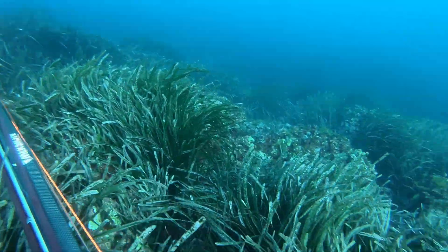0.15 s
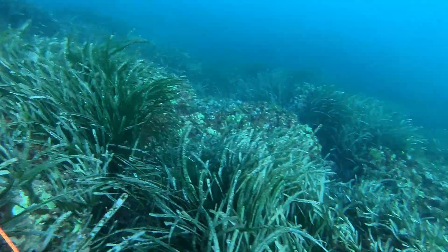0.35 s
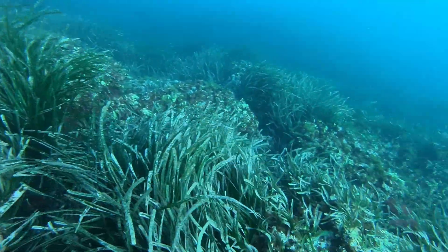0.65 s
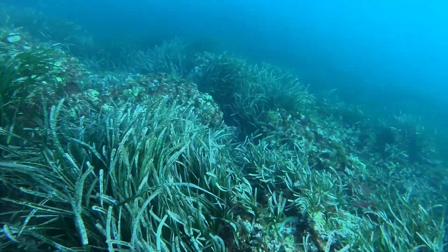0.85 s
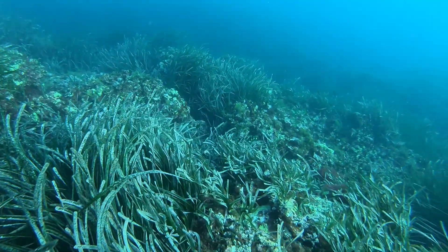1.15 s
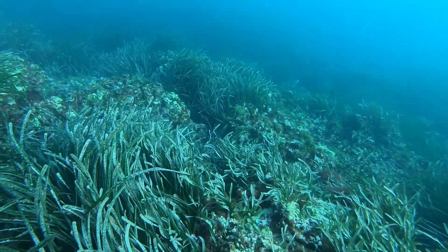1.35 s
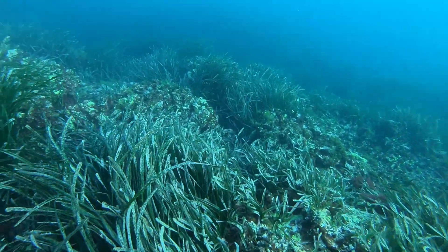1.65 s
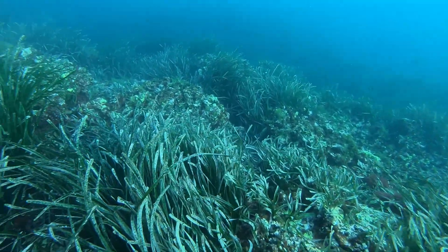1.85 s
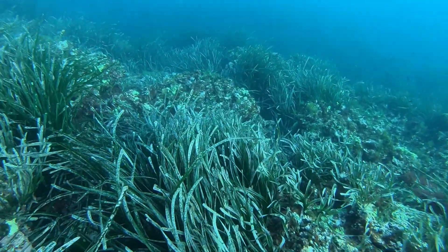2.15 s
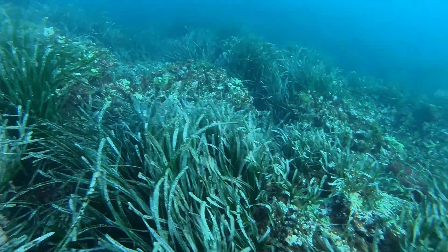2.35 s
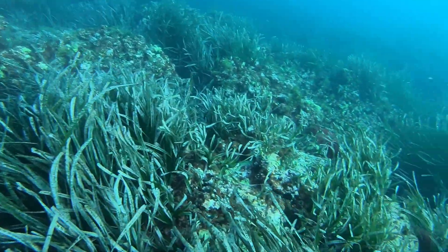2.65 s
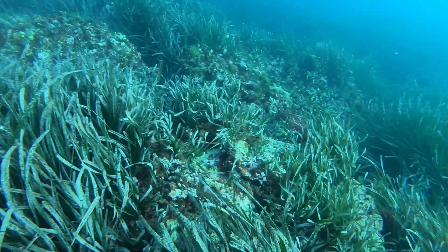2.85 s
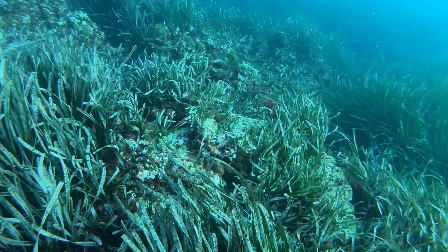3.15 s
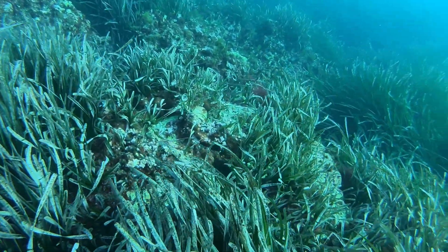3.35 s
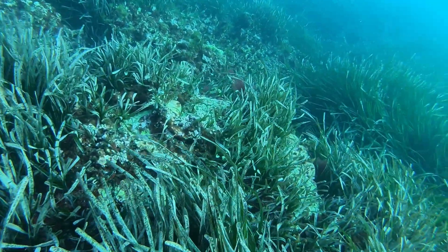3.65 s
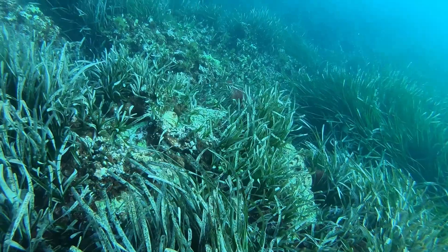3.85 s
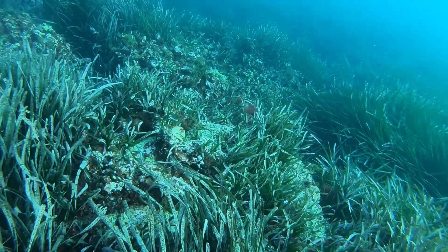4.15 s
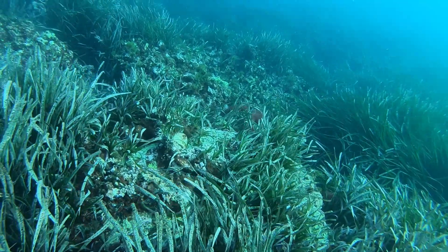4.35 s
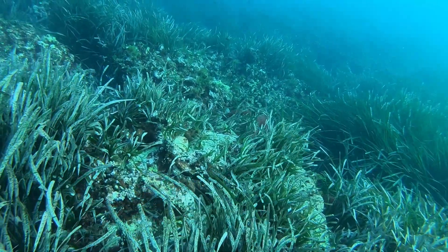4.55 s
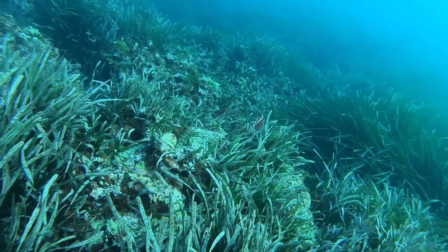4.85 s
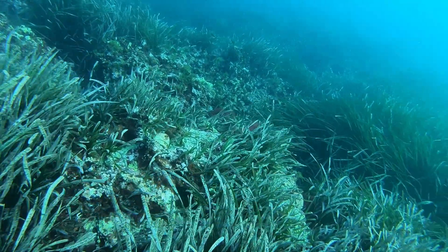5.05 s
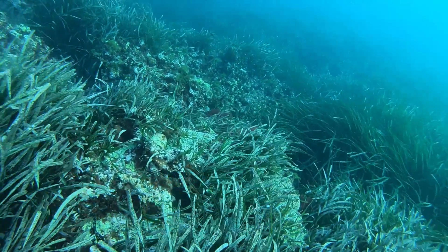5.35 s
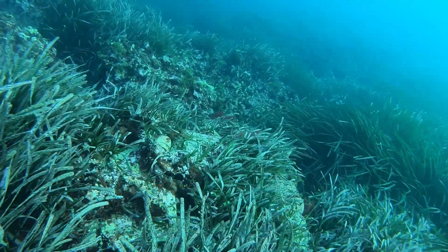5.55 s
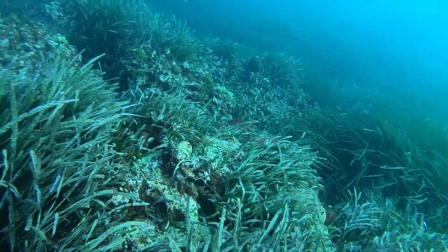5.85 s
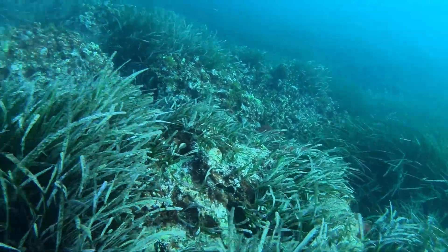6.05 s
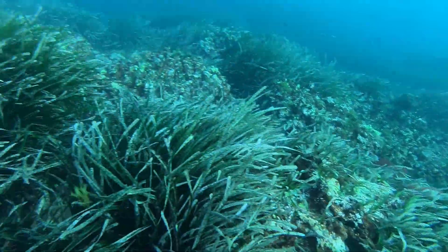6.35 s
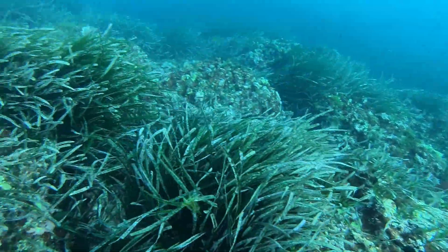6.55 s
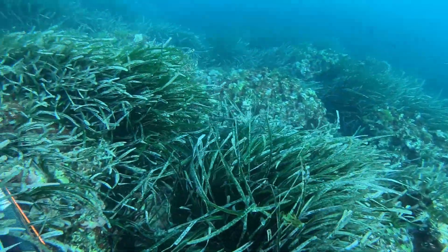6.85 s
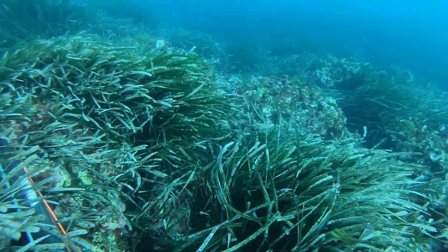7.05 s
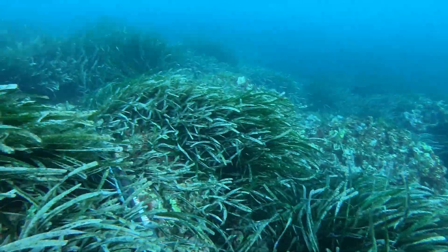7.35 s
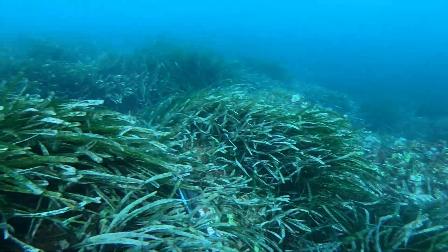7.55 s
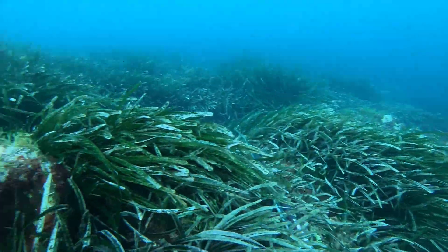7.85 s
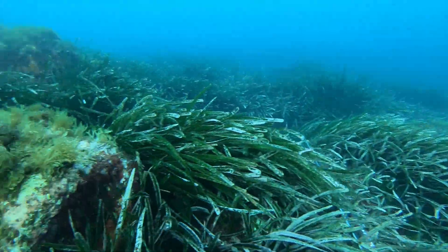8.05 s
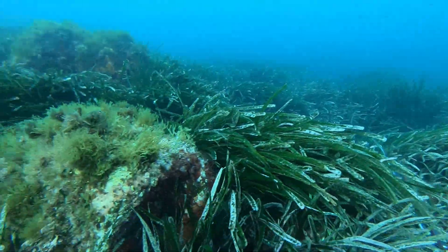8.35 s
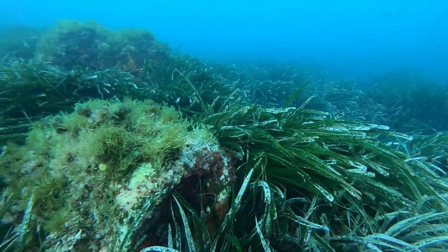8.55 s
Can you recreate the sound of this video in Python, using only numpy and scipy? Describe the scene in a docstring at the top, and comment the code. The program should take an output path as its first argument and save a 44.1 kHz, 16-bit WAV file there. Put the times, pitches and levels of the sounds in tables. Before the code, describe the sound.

A fine crackle of distant shrimp starts faintly and grows, dotted with sharp nearby snaps that ring briefly in a sealed underwater camera housing. Water surges past with a low rumble, peaking along with a cluster of muffled bumps on the housing. The rumble then eases while the crackle goes on, with a few small bubbly plops, and another short group of dull thumps comes near the end.

```python
"""A low rumble of water surges past a sealed camera housing, heard from inside, over a seagrass bed.
Snapping shrimp crackle far and near; each snap rings the stiff housing, whose ringing tones reach
the two microphones unevenly. The housing is bumped with dull thumps and swells shove it. A few short
plops, gulps and knocks come from bubbles or the bumped housing. Late on, the left channel fades over
to the right microphone, then starts to return."""
import sys
import numpy as np
from scipy import signal
from scipy.io import wavfile

SR = 44100
rng = np.random.default_rng(int(sys.argv[2]) if len(sys.argv) > 2 else 0)


def wrap_up_sound(samples):
    """Save the sound to the file named by the first command line argument, as 16-bit audio."""
    columns = np.atleast_2d(samples).T
    # keep every value between -1 and 1, then stretch to whole-number steps
    tamed = np.clip(columns, -1, 1)
    steps = np.round(tamed * 32767).astype(np.int16)
    wavfile.write(sys.argv[1], SR, steps)


N = 384111


def from_db(db):
    """Turn decibels into a number to multiply by."""
    return 10 ** (np.asarray(db) / 20)


def rms_one(x):
    """Scale a signal so its average strength (rms) is 1."""
    return x / np.sqrt(np.mean(x ** 2) + 1e-20)


def curve(rows):
    """Join (time, value) points with straight lines, giving one value per sample."""
    return np.interp(np.arange(N) / SR, *np.transpose(rows))


def band(x, low_hz, high_hz):
    """Keep the sound between two frequencies."""
    return signal.sosfilt(signal.butter(2, [low_hz, high_hz], "band", fs=SR, output="sos"), x)


def drift(rate_hz):
    """Wander to a new random value rate_hz times a second."""
    return np.interp(np.arange(N) / SR * rate_hz, np.arange(400), rng.standard_normal(400))


def surge():
    """Passing water makes slow rocking, a lumpy rumble and, higher up, a wash that differs by side."""
    # strength of the surge: (time [s], level [dB])
    strength = [(0.0, -54.5), (0.77, -66.5), (2.0, -61.5), (2.4, -49), (3.1, -45), (3.69, -48.5),
                (4.61, -55.5), (6.35, -63.5), (7.0, -79.5), (7.3, -64.5), (8.05, -76.5), (8.37, -55.5),
                (8.71, -62)]
    # rocking, rumble, wash: (low [Hz], high [Hz], left-right likeness [0-1], base [dB], swing share [0-1])
    bands = [(9.15, 15.17, 1, -51, 0.43), (24.9, 46, 0.83, -53, 0.72), (119.6, 214.5, 0, -64, 0.43)]
    mean_db, wash_start_db, wash_in_s = -55, -14, 1.32
    swing_db, layers = curve(strength) - mean_db, []
    for low_hz, high_hz, alike, base_db, share in bands:
        noise = band(rng.standard_normal((2, N + SR)), low_hz, high_hz)
        middle, side = rms_one(band(noise, 0.85 * low_hz, 3.56 * high_hz)[:, SR:])
        width = np.sqrt((1 - alike) / (1 + alike))
        lumps = from_db(base_db + share * swing_db + 4.84 * drift(20.5))
        layers.append(lumps * (middle + width * side * [[1], [-1]]))
    rocking, rumble, wash = layers
    fade_in = from_db(wash_start_db * np.clip(1 - np.arange(N) / SR / wash_in_s, 0, 1))
    return rocking + rumble + wash * fade_in


def far_snaps(level):
    """Far shrimp snap in clumps, each heard by five paths. Gives (sample, size, brightness [dB])."""
    snaps_per_s = 750 * from_db(4.5 * drift(12))
    at = np.flatnonzero(rng.random(N) < snaps_per_s / SR)[:, None]
    sizes = from_db(5.63 * np.minimum(rng.exponential(1, at.shape), 3.4) - 14.5) * level[at]
    lag = rng.exponential(.0024 * SR, (len(at), 5)).astype(int)
    paths = sizes * rng.standard_normal(lag.shape)
    bright_db = np.clip(rng.normal(2.28, 4.1, at.shape), -5.0, 11.0)
    return np.minimum(at + lag, N - 1).ravel(), paths.ravel(), np.repeat(bright_db, 5)


def near_snaps():
    """Near snaps echo off rock, grass and surface. Gives (sample, size, brightness [dB])."""
    # claws snapping close by: (time [s], strength [dB], brightness [dB])
    snaps = [(0.201, -58.5, 18), (0.7495, -42, -3.5), (1.073, -40, 1.5), (1.3332, -48, 9), (1.39, -40.5, 4),
             (1.4186, -42.5, 1.5), (1.965, -48.5, 9.5), (2.0023, -51, 4), (2.013, -40.5, -5.5),
             (2.108, -39, 9.5), (2.15, -32, 0), (2.2633, -56, 11), (2.339, -39, 2), (2.4398, -29.5, -0.5),
             (2.71, -49.5, 14), (2.7542, -39.5, 17), (3.1436, -38, -5), (3.1504, -37.5, 2.5),
             (3.267, -55, 21), (3.3939, -38, 4.5), (3.622, -45, 8), (3.9204, -32, 5.5), (4.0161, -24.5, 9),
             (4.0252, -35.5, 11), (4.493, -41.5, -2), (4.568, -40, 12.5), (4.6288, -55, 20.5),
             (4.805, -35, 1), (4.892, -55, 21), (5.339, -35, 4.5), (5.4616, -54.5, 26),
             (5.5433, -39.5, 17.5), (5.714, -36.5, -0.5), (5.734, -39, 4.5), (5.791, -37.5, 4),
             (5.85, -37.5, -3), (5.9945, -37, 19.5), (6.0031, -38.5, 4), (6.064, -39.5, 1),
             (6.081, -35.5, 4.5), (6.2925, -39.5, 11), (6.8846, -42.5, 11), (7.015, -36, 2.5),
             (7.0586, -28, 4.5), (7.109, -56, 22), (7.142, -44, 6), (7.233, -45.5, 9), (7.47, -55, 9),
             (7.5315, -48.5, 11), (7.572, -45.5, 15.5), (7.656, -35, 8), (7.683, -50, 21),
             (7.69, -45, 17.5), (8.3035, -44, -10), (8.3951, -41, 4.5), (8.4539, -35.5, -5.5),
             (8.4912, -43, -1), (8.553, -41.5, 11), (8.6018, -41, -4)]
    time_s, strength_db, bright_db = np.transpose(snaps)[:, :, None]
    lag_s = 0.034 * rng.random((len(time_s), 40)) ** 1.8 - .0008   # below zero: the claw is shutting
    echo = from_db(-14.5 - 60 * lag_s / 0.1) * rng.standard_normal(lag_s.shape)
    lag_s[:, 0], echo[:, 0] = 0, 1   # the direct sound
    at = np.minimum(np.round((time_s + lag_s) * SR).astype(int), N - 1)
    return at.ravel(), (from_db(strength_db) * echo).ravel(), np.repeat(bright_db, 40)


def ring(x, hz, fade_s, phase):
    """Each click in x starts a tone that dies away by 60 dB in fade_s."""
    decay, step = from_db(-60 / (fade_s * SR)), 2 * np.pi * hz / SR
    feedback = [1, -2 * decay * np.cos(step), decay * decay]
    return signal.lfilter([np.sin(phase), decay * np.sin(step - phase)], feedback, x + 1e-18)


def housing(at, sizes, bright_db, spread_db, blur):
    """Snaps and a soft hiss ring the housing's natural tones, a little differently on each side."""
    # the housing's natural tones: (pitch [Hz], time to fade 60 dB [s], level [dB],
    # lean to the left [dB], left head start [radians], left-right likeness [0-1])
    tones = [(838, 0.0093, 1, -3.5, 3, 0.68), (1280, 0.021, -11, 2.5, 4.5, 0.01),
             (1632, 0.066, -20, -8.5, 1.5, 0.1), (1807, 0.022, -8, -9, 0.53, 0.5),
             (1985, 0.032, -15.5, -2.5, 3, 0.2), (2690, 0.0073, -6, -9.5, 0.08, 1),
             (2968, 0.0064, -3, -6.5, -0.35, 0.34), (3336, 0.0093, -11.5, 3, -0.9, 0.58),
             (4430, 0.0055, -10.5, -4.5, -3, 0.47), (5285, 0.0036, -9, -12, -1.5, 0.5),
             (5995, 0.0079, -7, 1, 1.55, 0.9), (6700, 0.0046, -9, 10.5, 1, 0.35),
             (7730, 0.0017, -1, 3.5, 2.18, 0.2), (9830, 0.0015, 3.5, -6, 0.78, 0)]
    rung = np.zeros((2, 2, N))   # snaps and hiss, each left and right
    shared, *apart = blur * rng.standard_normal((3, N))
    for hz, fade_s, level_db, pan_db, lead, alike in tones:
        tilt = np.clip(np.log2(hz / 3400), -1.1, .7)   # bright snaps favour the high tones
        chance_db = spread_db * rng.standard_normal(N)[at // 300]   # close echoes share a colour
        struck = sizes * from_db(tilt * bright_db + chance_db)
        swell = from_db(0.45 * drift(2.485))   # each tone grows and fades as the housing turns
        left_gain = alike + np.sqrt(1 - alike ** 2) * rng.choice([-1, 1], len(at))
        for side, (lean, gain) in enumerate([(0.9, left_gain), (-1.008, 0.91)]):
            clicks = np.bincount(at, struck * gain * swell[at], N)
            hiss = swell * (np.sqrt(alike) * shared + np.sqrt(1 - alike) * apart[side])
            ringing = ring(np.array([clicks, hiss]), hz, fade_s, lean * lead / 2)
            rung[:, side] += from_db(level_db + lean * pan_db / 2) * ringing
    snaps = band(band(rung[0], 1840.0, 9870.0), 820.0, 14100.0)   # a snap hardly moves the lowest tones
    walls = signal.butter(4, 6600.0, fs=SR, output="sos")   # thick walls pass little treble
    bass_cut = signal.butter(2, 560.0, "high", fs=SR, output="sos")
    heard = signal.sosfilt(bass_cut, signal.sosfilt(walls, snaps + rung[1]))
    # a dip between two tones, where both walls move together
    heard -= 0.62 * band(heard.mean(axis=0), 2010.0, 2654.0)
    # above the tones a faint fizz leaks in, different on each side
    tick_sizes = sizes * from_db(0.9 * bright_db)
    ticks = [np.bincount(at, tick_sizes * rng.choice([-1, 1], len(at)), N) for side in range(2)]
    leak = np.array(apart) + 0.19 * np.array(ticks)
    fizz = band(band(leak, 9600.0, 15000.0), 4900.0, 12260.0)
    return heard + from_db(3.0) * fizz


def shrimp():
    """Far and near snaps ring the housing; the farthest blur into a hiss."""
    # crackle of the distant colony: (time [s], level [dB])
    colony = [(0.0, -78), (0.6, -72.5), (2.45, -60.5), (3.47, -65.5), (4.07, -62), (5.14, -64),
              (5.65, -63.5), (8.71, -64)]
    level = from_db(curve(colony))
    far, near = far_snaps(level), near_snaps()
    at, sizes, bright_db = [np.concatenate(pair) for pair in zip(far, near)]
    spread_db = np.repeat([5.5, 2.5], [len(far[0]), len(near[0])])   # far snaps strike less evenly
    blur = level * from_db(-15.5 + 2.7 * drift(12))
    return housing(at, sizes, bright_db, spread_db, blur)


def bumps():
    """Bumped, the housing swings on its mount and sags in pitch, with a rough thud and a knock."""
    # bumps on the housing: (time [s], strength [dB], pitch [Hz], length to fade 60 dB [cycles],
    # knock strength [dB], lean to the left [dB])
    hits = [(0.425, -23.5, 123, 11, -67, -4.5), (0.993, -37.5, 223, 6.5, -42, -7),
            (1.335, -25.5, 148, 3, -39, 19.5), (1.644, -35.5, 194.5, 14, -55, -8),
            (2.255, -21, 98.5, 8.5, -49, -7), (2.281, -24.5, 185, 14.5, -69, -7),
            (2.546, -33, 190, 32, -45.5, -4), (2.868, -22.5, 161, 19, -81, -2),
            (3.041, -12.5, 140.6, 12, -57, -3.5), (3.089, -8, 108.2, 17, -52.5, -4),
            (3.217, -28.5, 109, 7, -81, -5), (4.205, -26, 129, 11, -60, -6.5),
            (5.663, -40, 228, 5, -41.5, -9), (8.207, -25.5, 209, 14, -49.5, 6),
            (8.235, -23.5, 175, 19.5, -56, -6.5), (8.262, -13.5, 123, 8.5, -71, 3.5),
            (8.448, -22.5, 161, 5.5, -50, -4)]
    rise_share, sag_per_s, thud_db, knock_rise_s = 0.029, 5.85, -19, 0.00024
    out, t = np.zeros((2, N + SR)), np.arange(SR // 3) / SR
    knock_noise = rms_one(band(rng.standard_normal(N + SR), 230.0, 1640.0))
    for time_s, strength_db, hz, cycles, knock_db, pan_db in hits:
        start, fade_s = round(time_s * SR), cycles / hz
        span = slice(start, start + len(t))
        swing = np.sin(2 * np.pi * hz * (1 - np.exp(-t * sag_per_s)) / sag_per_s)
        thud = rms_one(band(rng.standard_normal(2 * len(t)), 181.0, 220.0)[len(t):])
        rise = (1 - np.exp(-t / fade_s / rise_share)) ** 2   # long swings build slowly
        body = (swing + from_db(thud_db) * thud) * from_db(strength_db) * rise
        knock = knock_noise[span] * from_db(knock_db) * (1 - np.exp(-t / knock_rise_s)) ** 2
        sides = from_db([[pan_db / 2], [-pan_db / 2]])
        # the knock flexes the walls, so the left microphone hears it weaker and upside down
        out[:, span] += from_db(-60 * t / fade_s) * (sides * body + knock * [[-0.4], [1.4]])
    return out[:, :N]


def lurches():
    """A swell shoves the housing, making a very low wave: one dip between two rises."""
    # shoves from the water: (middle time [s], strength [dB], pitch [Hz])
    shoves = [(0.448, -33, 45), (1.514, -36.5, 19), (2.254, -27, 19), (2.269, -24.5, 34), (3.055, -21, 51),
              (3.109, -36.5, 15.6), (3.171, -31, 32), (3.439, -39, 13), (3.479, -28.5, 36.4),
              (3.69, -28.5, 14.6), (4.751, -27.5, 12.7), (5.838, -31.5, 13.7), (7.214, -37, 14),
              (8.301, -29, 37), (8.333, -36.5, 18)]
    cycles = 2.97
    out, t = np.zeros(N), np.arange(N) / SR
    for middle_s, strength_db, hz in shoves:
        span = np.abs(t - middle_s) < cycles / hz / 2
        wave = np.cos(2 * np.pi * hz * (t[span] - middle_s))
        out[span] -= from_db(strength_db) * np.hanning(span.sum()) * wave
    return out


def plops_and_knocks():
    """Bubbles or the bumped housing give brief, rough, fluttering blips that rise a little in pitch."""
    # short plops, gulps and knocks: (time [s], strength [dB], starting pitch [Hz])
    blips = [(2.783, -36.5, 186), (3.03, -41, 1810), (3.104, -51, 970), (4.117, -41, 1730),
             (4.17, -41, 1570), (7.265, -44, 183), (7.364, -53, 254), (7.454, -48.5, 284),
             (7.512, -43.5, 192), (7.545, -40.5, 1785), (8.205, -38, 470), (8.22, -33.5, 403)]
    fade_s, rise_cycles, apart_hz = 0.048, 0.41, 2520
    out, t = np.zeros((2, N)), np.arange(SR // 10) / SR
    for time_s, strength_db, hz in blips:
        wobble, flutter = [np.interp(t * hz / 6.0, np.arange(40), points)
                           for points in rng.standard_normal((2, 40))]
        offset = hz / apart_hz * np.array([[1], [-1]])   # high blips reach the two sides out of step
        tone = np.sin(2 * np.pi * hz * t * (1 + 1.4 * t) + 1.1 * wobble + offset)
        rise = 1 - np.exp(-t * hz / rise_cycles)
        loudness = rise * from_db(strength_db + 5.2 * flutter - 60 * t / fade_s)
        start = round(time_s * SR)
        out[:, start:start + len(t)] += tone * loudness
    return out


def scene():
    """Shrimp and bumps, plus surge, lurches and blips, which are a little stronger on the right."""
    return shrimp() + bumps() + (surge() + lurches() + plops_and_knocks()) * from_db([[-1.2], [1.2]])


def record(dry):
    """The recorder fades its left channel to the right microphone and partly back, and cuts the top."""
    merge_at_s, merge_fade_s, return_at_s, return_fade_s = 6.196, 0.34, 8.4, 0.29
    apart_above_hz, cutoff_hz = 11700, 16100   # the high treble keeps its own sides
    t = np.arange(N) / SR
    merged = 1 - np.exp(-np.maximum(t - merge_at_s, 0) / merge_fade_s)
    merged *= np.exp(-np.maximum(t - return_at_s, 0) / return_fade_s)
    left, right = dry
    to_right = signal.sosfiltfilt(signal.butter(4, apart_above_hz, fs=SR, output="sos"), right - left)
    mixed = np.array([left + merged * to_right, right])
    return signal.sosfilt(signal.cheby2(16, 50, cutoff_hz, fs=SR, output="sos"), mixed)


dry = scene()
out = record(dry)
wrap_up_sound(out)
```